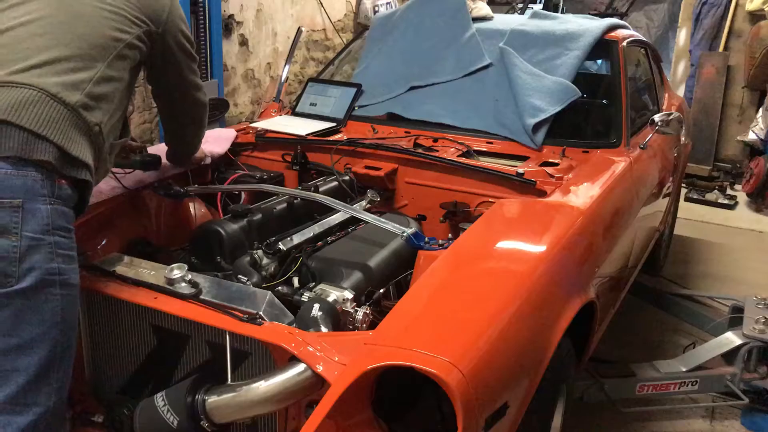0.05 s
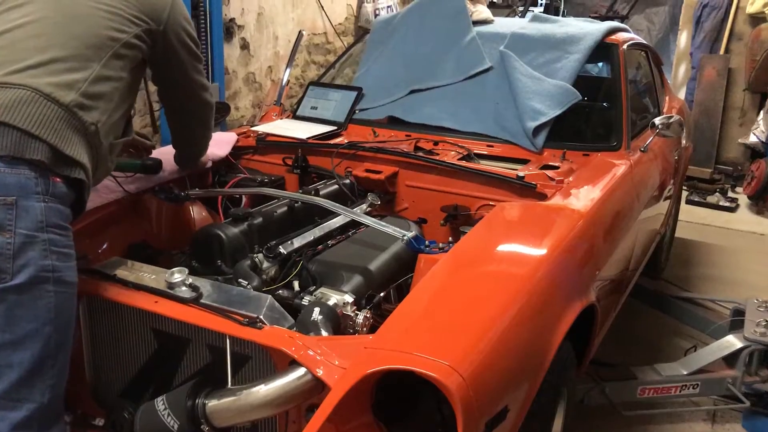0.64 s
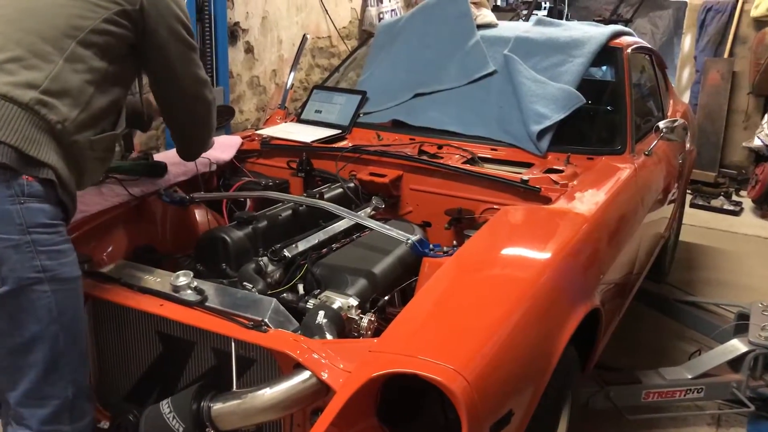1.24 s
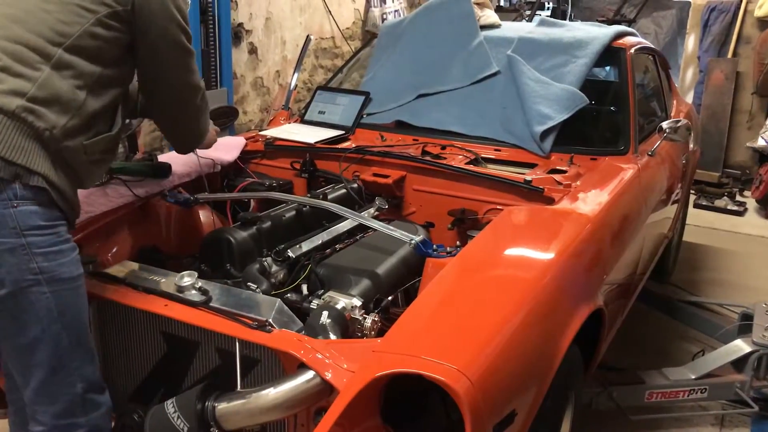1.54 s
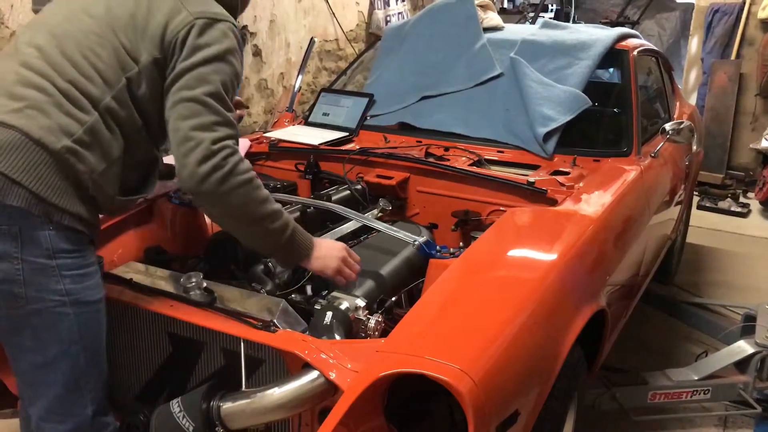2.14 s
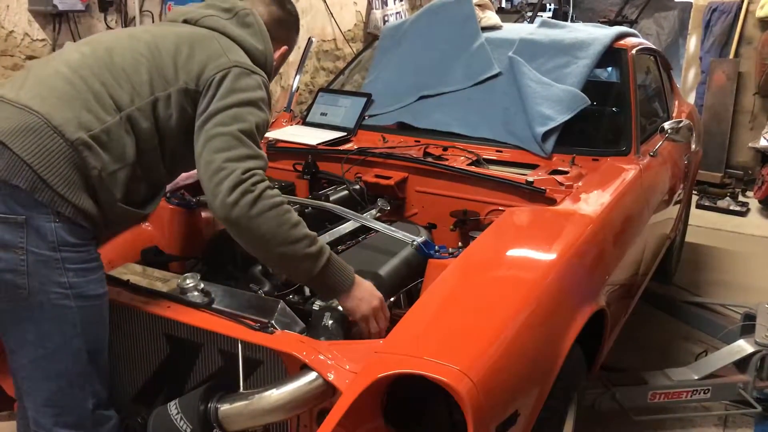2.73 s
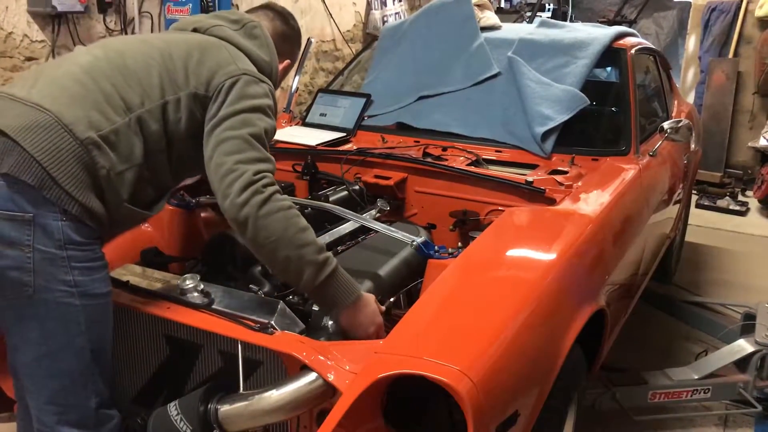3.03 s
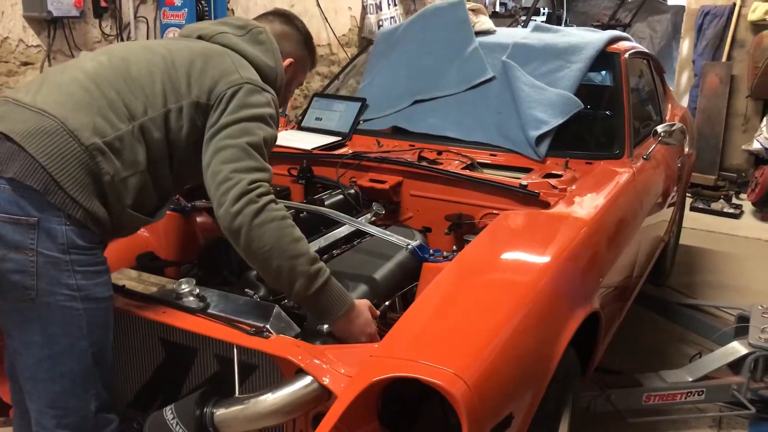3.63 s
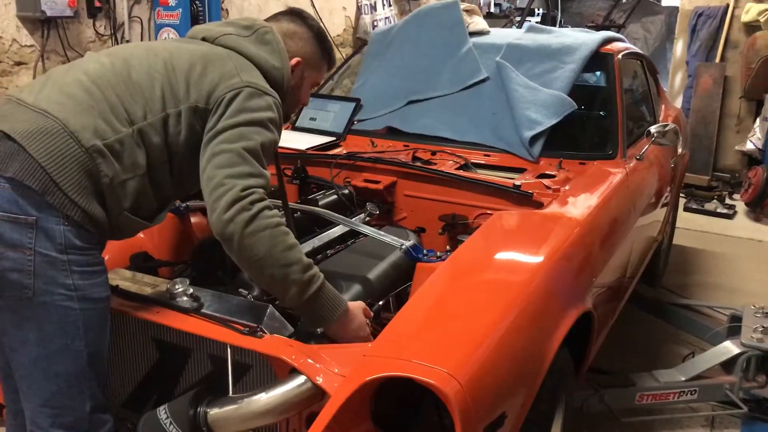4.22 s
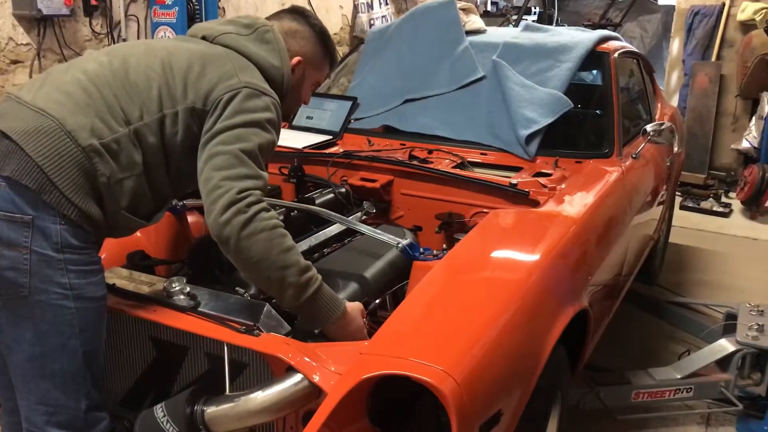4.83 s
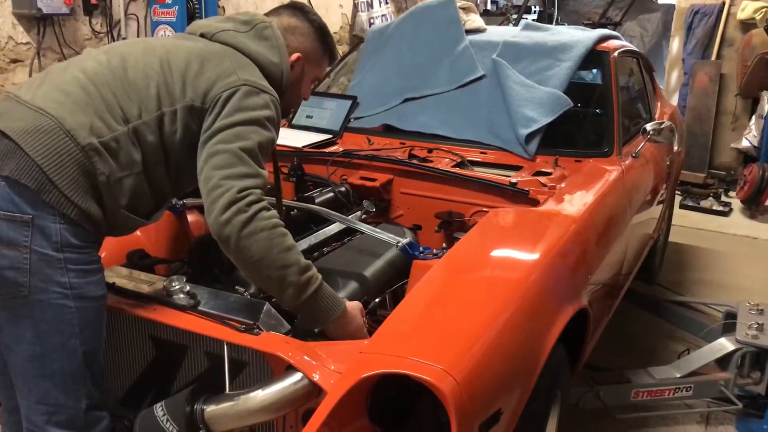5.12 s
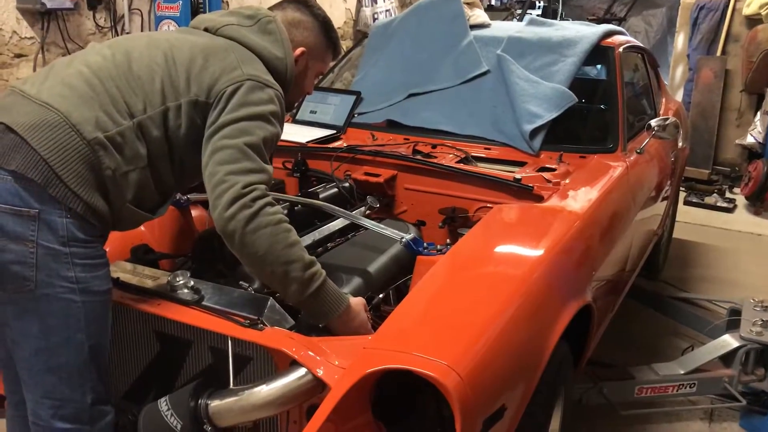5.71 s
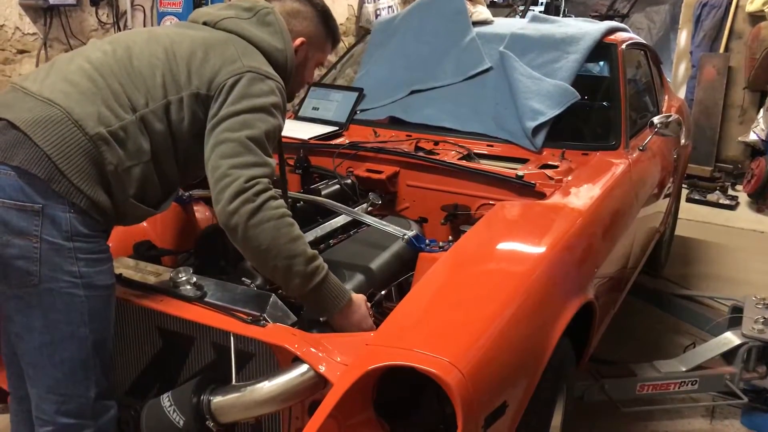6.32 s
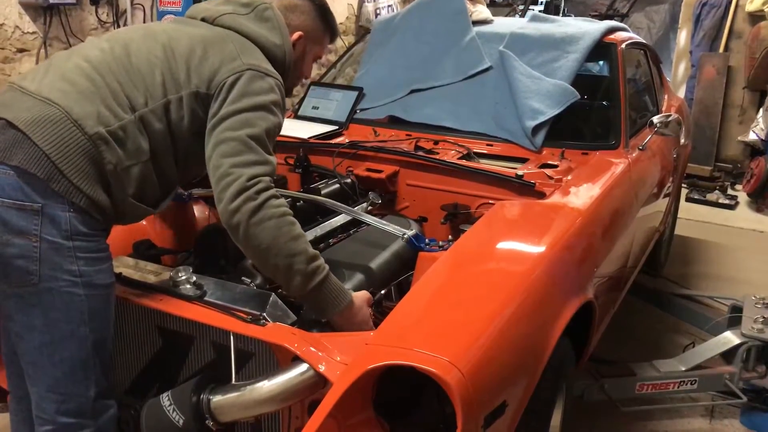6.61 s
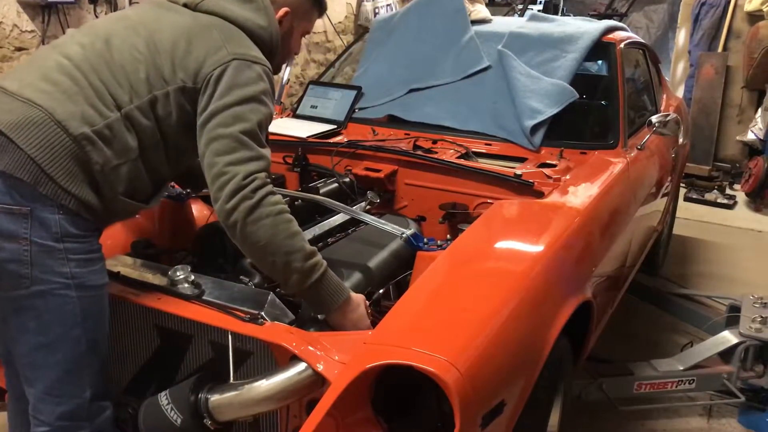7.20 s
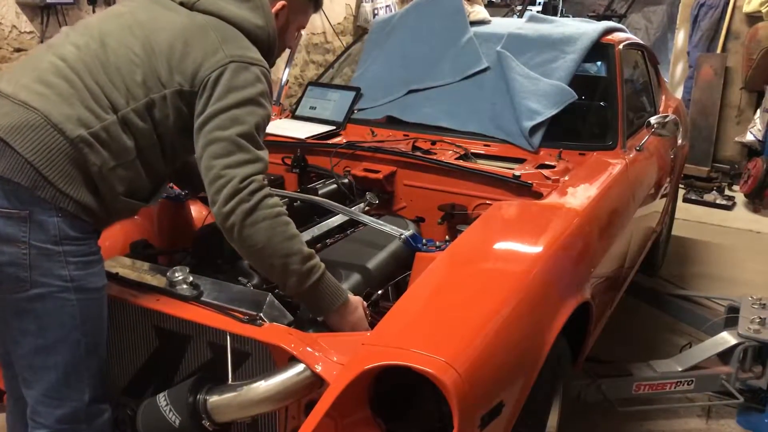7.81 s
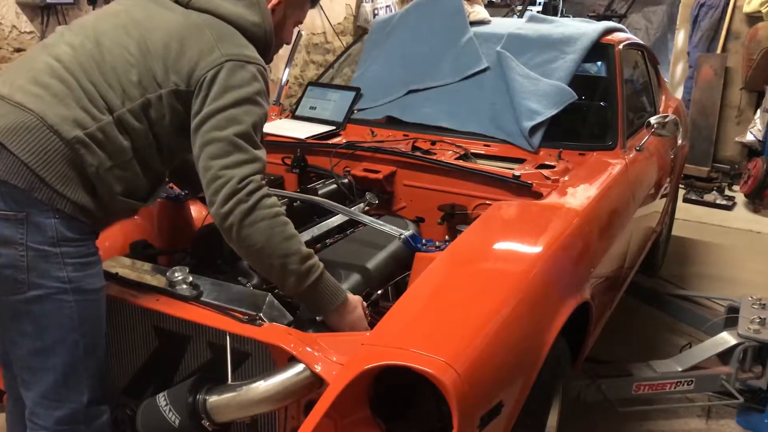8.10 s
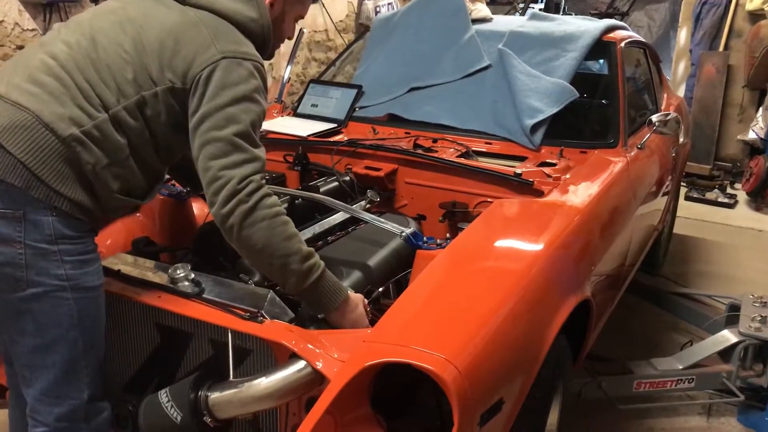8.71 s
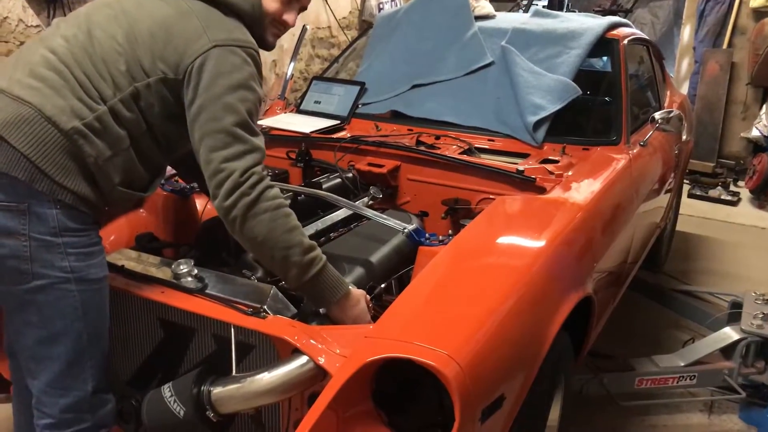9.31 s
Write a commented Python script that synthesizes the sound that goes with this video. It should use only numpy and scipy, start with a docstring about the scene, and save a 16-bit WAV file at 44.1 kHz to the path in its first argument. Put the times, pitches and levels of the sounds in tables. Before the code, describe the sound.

For the first three seconds the workshop is very quiet, with faint sleeve rustles and a few light handling clicks. A weak, wavering whine comes and goes from about 1.5 to 3 seconds, leaving only a low room rumble. At 4.6 seconds a starter engages with a sharp clack and cranks with a metallic, grinding whirr and pulsing hisses. The car engine coughs at about 5.7 seconds, stumbles, then catches just after 6 and revs up loudly, with a deep exhaust drone, valve clatter and rasping intake. The revs sag around 7 seconds, and the throttle gives a tiny squeak. From 7.4 seconds until the end, a little past 9, uneven blips follow one another, broken by thumping, spitting backfires, strongest near 7.8 and 8.2 seconds. It is all heard from in front of the open engine bay, with a short room echo.

```python
"""Straight-six starting in a workshop

Heard from in front of the open engine bay. Sleeves rustle, things click, a faint whine comes and goes.
The starter pinion slams in and its teeth ring the bell housing, slowing at each compression. The engine
coughs, catches and is blipped unevenly by hand: firings drone and thud in the exhaust, valves clatter
on the block, and gulps of air rasp in the intake, which spits when a charge burns late."""
import sys
import numpy as np
from scipy import signal
from scipy.fft import rfft, irfft, next_fast_len
from scipy.io import wavfile
from scipy.ndimage import uniform_filter1d, map_coordinates

SR = 44100
rng = np.random.default_rng(int(sys.argv[2]) if len(sys.argv) > 2 else 0)


def unload_audio(sound):
    """Save the sound as a 16-bit wav file, at the path given as the first command line argument."""
    columns = np.transpose(np.atleast_2d(sound))
    # keep every value between -1 and 1, then stretch to whole-number steps
    steps = np.round(np.clip(columns, -1, 1) * 32767)
    wavfile.write(sys.argv[1], SR, steps.astype(np.int16))


N = 412335


def amp(db):
    """dB to gain."""
    return 10 ** (np.asarray(db) / 20)


def unit(x):
    """x at rms 1."""
    return x / np.sqrt(np.mean(x ** 2) + 1e-20)


def clock():
    """Seconds at each sample."""
    return np.arange(N) / SR


def along(points, hz):
    """Interpolate (freq_hz, value) points on a log axis."""
    freqs, values = np.transpose(points)
    return np.interp(np.log(hz + 1), np.log(freqs + 1), values)


def curves(rows):
    """One value per sample for each column after the time."""
    time_s, *columns = np.transpose(rows)
    return [np.interp(clock(), time_s, column) for column in columns]


def fade(start_s, length_s):
    """Ramp from 0 to 1."""
    return np.clip((clock() - start_s) / length_s, 0, 1)


def swell(start_s, held_s, rise_s, decay_s):
    """Envelope that rises, then decays from held_s after its start."""
    return fade(start_s, rise_s) * np.exp(-np.maximum(clock() - start_s - held_s, 0) / decay_s)


def wobble(rate_hz):
    """Smooth random curve."""
    return map_coordinates(rng.standard_normal(int(N * rate_hz / SR) + 4), [clock() * rate_hz])


def filtered(x, response):
    """x through a complex frequency response."""
    size = next_fast_len(N + SR // 2)
    return irfft(rfft(x, size) * response(np.fft.rfftfreq(size, 1 / SR)), size)[:N]


def coloured(x, spectrum):
    """x shaped by a spectrum, rms 1."""
    return unit(filtered(x, lambda hz: amp(along(spectrum, hz))))


def noise(spectrum):
    """Noise shaped by (freq_hz, level_db) points, rms 1."""
    return coloured(rng.standard_normal(N), spectrum)


def ringing(x, modes):
    """x through (pitch_hz, width_hz, level_db) resonances, rms 1."""
    def response(f):
        return sum((-1) ** k * amp(db) * 1j * f * width / (hz * hz - f * f + 1j * f * width)
                   for k, (hz, width, db) in enumerate(modes))
    return unit(filtered(x, response))


def patchy(x, depth_db):
    """Turbulence: brief patches of the spectrum swell and sink; rms 1."""
    spectra = signal.stft(x, nperseg=512)[2]
    field = uniform_filter1d(rng.standard_normal(spectra.shape), size=7, axis=0)
    field = unit(uniform_filter1d(field, size=6, axis=1))
    return unit(signal.istft(spectra * amp(depth_db * field), nperseg=512)[1][:N])


def pulses(count, pattern, scatter):
    """An impulse at each whole count, sized by a repeating pattern with log-normal scatter."""
    at = np.flatnonzero(np.diff(np.floor(count)) > 0)
    train = np.zeros(N)
    train[at] = np.resize(pattern, len(at))
    return train * np.exp(scatter * rng.standard_normal(N))


def trail(train, decay_s):
    """Exponential tail on each impulse."""
    return signal.lfilter([1], [1, -np.exp(-1 / (SR * decay_s))], train)


def bursts(start_s, level_db, decay_s, rise_s=0.001):
    """Envelope of sudden blows that die away."""
    blows = np.bincount(np.round(start_s * SR).astype(int), amp(level_db), N)
    return trail(blows, decay_s) - trail(blows, rise_s)


# room background: freq_hz, level_db
ROOM_SPECTRUM = [(12, -49), (20, -19), (65, 1), (150, -8.5), (270, -13.5), (520, -19), (1000, -22),
                 (1860, -24), (3630, -28), (5000, -32), (13000, -38), (16000, -45)]

def room_tone(level_db=-62):
    """Steady low rumble of the quiet room."""
    return amp(level_db) * noise(ROOM_SPECTRUM)


# sleeve movements: start_s, held_s, level_db
SLEEVE_MOVES = [(0.07, .03, -63.5), (1.18, .3, -68.5), (1.59, .4, -64), (2.1, 0.62, -70.5)]
# cloth friction: freq_hz, level_db
CLOTH_SPECTRUM = [(500, -9), (1500, 1), (2250, -1), (3000, -5), (4800, -9), (9000, -17.5)]

def sleeves(gain_db=-2):
    """Cloth rubs in short, uneven strokes."""
    strokes = sum(amp(db) * swell(start_s, held_s, rise_s=0.0084, decay_s=0.2)
                  for start_s, held_s, db in SLEEVE_MOVES)
    return strokes * amp(gain_db + wobble(26)) * noise(CLOTH_SPECTRUM)


# handling taps: start_s, level_db, knock_offset_db
HANDLING_TAPS = [(0.0994, -63, -12), (0.6994, -56, -6), (1.1982, -52.5, 4), (1.6067, -43.5, -11),
                 (1.6294, -57, -12), (1.694, -47, -11), (1.9924, -45.5, -19), (2.2944, -50, -11),
                 (2.3694, -56, 0), (2.5194, -55, 2)]
# sharp click: freq_hz, level_db
CLICK_SPECTRUM = [(800, -30), (2200, 2), (4800, 0.5), (7000, -7), (10000, -13.5), (16000, -12)]
# midrange of a knock or cough: freq_hz, level_db
BARK_SPECTRUM = [(200, -26), (550, 0.5), (800, 4.5), (1100, 5.5), (1500, -4.5), (2300, -15), (5000, -27)]

def taps(click_db=-6, knock_db=-8):
    """Small handling impacts, each a click over a duller knock."""
    start_s, level_db, offset_db = np.transpose(HANDLING_TAPS)
    clicks = bursts(start_s, level_db + click_db, decay_s=0.011) * noise(CLICK_SPECTRUM)
    knocks = bursts(start_s, level_db + offset_db + knock_db, decay_s=0.012) * noise(BARK_SPECTRUM)
    return clicks + knocks


# whine contour: time_s, pitch_hz, level_db
WHINE_PATH = [(1.35, 620, -83), (1.65, 690, -70), (1.95, 713, -80), (2.5, 741, -68.5), (2.93, 673, -74),
              (3.1, 653, -92)]

def whine(overtone_db=-7):
    """A faint, wavering tone rises and sinks."""
    pitch_hz, level_db = curves(WHINE_PATH)
    phase = 2 * np.pi * np.cumsum(pitch_hz * (1 + 0.026 * wobble(120))) / SR
    tone = np.sin(phase) + amp(overtone_db + 3.4 * wobble(7.6)) * np.sin(3 * phase)
    return amp(level_db + 3.8 * wobble(22)) * tone * fade(1.3, 0.1) * (1 - fade(3.05, 0.1))


# solenoid and pinion impacts: start_s, level_db
SLAM_HITS = [(4.563, -28.5), (4.577, -20), (4.589, -18)]
# impact noise: freq_hz, level_db
SLAM_SPECTRUM = [(35, -48), (60, -19), (124, -15), (227, -18), (553, -2.5), (842, -11), (991, -9),
                 (1780, -7), (2000, -11), (5860, -15), (16000, -32)]

def pinion_slam():
    """The solenoid bangs the pinion into the flywheel."""
    return bursts(*np.transpose(SLAM_HITS), decay_s=0.019) * noise(SLAM_SPECTRUM)


# bell housing modes: pitch_hz, width_hz, level_db
HOUSING_MODES = [(380, 55, -19), (485, 40, -2), (555, 45, -9), (668, 42, 3.5), (735, 45, -6), (890, 60, -9),
                 (950, 60, -11), (1040, 50, -10), (1125, 45, -6), (1250, 80, -11), (1428, 60, -9),
                 (1497, 50, -5), (1820, 90, -11), (2750, 300, -15), (3160, 300, -20)]
# gear grinding: freq_hz, level_db
GRIND_SPECTRUM = [(53, -48), (90, -26), (129, -22), (193, -19), (265, -4.5), (360, -8), (471, -1.5),
                  (588, -26), (667, 2), (810, -12.5), (1130, -2), (1230, -17), (2500, -18), (3250, -44),
                  (5500, -120)]
# pinion scraping: freq_hz, level_db
SCRAPE_SPECTRUM = [(900, -6), (2000, -9), (3000, -4.5), (4000, -3.5), (5400, 2.5), (6500, -4),
                   (7800, -13.5), (10500, -14.5), (12500, -17.5), (16000, -18)]

def starter_gears(strain, overrun, tooth_hz=520, sag=0.13, ring_db=-30, grind_db=-32.5, scrape_db=-33):
    """Teeth ring the bell housing, grind and scrape, slowing at each compression."""
    teeth = np.cumsum(tooth_hz * (1 - sag * strain + 0.04 * wobble(50))) / SR
    mesh = unit(pulses(teeth, [1], scatter=0.23)) + 0.96 * rng.standard_normal(N)
    housing = patchy(ringing(mesh, HOUSING_MODES), depth_db=2.2)
    unloaded = 1 - fade(4.8, 0.038)
    letting_go = np.interp(clock() - 0.041, clock(), strain)  # loudest just after each compression
    labour_db = 3 * letting_go - 1.9 * unloaded
    whirr = amp(labour_db) * (amp(ring_db) * housing + amp(grind_db) * noise(GRIND_SPECTRUM))
    hiss_db = scrape_db + 0.5 * strain - 6 * unloaded * (1 - strain) + 5 * overrun + 1.4 * wobble(90)
    scrape = amp(hiss_db) * coloured(mesh + 2 * rng.standard_normal(N), SCRAPE_SPECTRUM)
    return whirr + scrape


def starter_hum(start_s, overrun, pitch_hz=131, level_db=-31, sag_db_per_s=20.5):
    """The motor hums most while its current is high."""
    current = amp(-sag_db_per_s * np.maximum(clock() - start_s, 0)) + 0.7 * overrun
    rumble = noise([(70, -20), (130, -17), (220, -35)])
    return amp(level_db) * current * ringing(rumble, [(pitch_hz, 22, 0)])


def chuff(level_db=-36):
    """Unburnt air puffs from the exhaust, strongest on the first strokes."""
    air = noise([(22, -28), (42, 10), (65, 6), (95, -30), (250, -67)])
    return air * fade(4.82, 0.032) * amp(level_db - 10 * fade(4.99, 0.088))


# cranking compressions: time_s, hiss_db
COMPRESSIONS = [(4.55, -50), (4.68, -42), (4.87, -33.5), (5.01, -32.5), (5.155, -28.5), (5.274, -32),
                (5.41, -32), (5.54, -28), (5.634, -27), (5.729, -40), (5.83, -28.5), (5.94, -28),
                (6.021, -25), (6.102, -34)]
# escaping air: freq_hz, level_db
SQUEEZE_SPECTRUM = [(1500, -9), (3000, 2), (5300, -1.5), (7000, -1.5), (9000, -4.5), (11500, -11),
                    (16000, -23)]

def cranking(engage_s=4.585, overrun_s=5.53, release_s=5.98):
    """The starter labours through compressions, each squeezing out a hiss, until the engine runs away."""
    strokes = np.interp(clock(), np.transpose(COMPRESSIONS)[0], np.arange(len(COMPRESSIONS)))
    strain = np.cos(2 * np.pi * strokes)
    overrun = fade(overrun_s, 0.16)
    gears = starter_gears(strain, overrun)
    hiss_db, = curves(COMPRESSIONS)
    squeeze = amp(hiss_db) * ((1 + strain) / 2) ** 2 * noise(SQUEEZE_SPECTRUM)
    engaged = fade(engage_s, 0.01) * (1 - fade(release_s, 0.22))
    return engaged * (gears + squeeze + starter_hum(engage_s, overrun) + chuff())


# pinion throw-outs: start_s, level_db
PINION_KICKS = [(5.61, -28), (5.991, -26.5), (6.172, -13)]

def pinion_sing():
    """The pinion sings as the engine throws it out."""
    kicks = sum(amp(db) * swell(s, held_s=0.022, rise_s=0.021, decay_s=0.017) for s, db in PINION_KICKS)
    return kicks * noise([(4500, -30), (5600, -6), (6050, -5), (6500, -13), (7500, -40)])


# exhaust response to shaft orders: pitch_hz, level_db
PIPE_RESPONSE = [(28, -42), (45, -26), (55, -19), (64, -14), (75, -12.5), (87, -30), (101, -21),
                 (115, -14.5), (130, -27.5), (152, -16.5), (166, -20), (184, -13.5), (195, -15),
                 (210, -28.5), (246, -25), (285, -44)]

def exhaust_drone(speed_hz, turns, drive, rough, idle_db=-13, idle_tilt_db=4.5, blur_rad=0.6):
    """Even firing drones on the first four shaft orders."""
    drone = 0
    for order, trim_db in enumerate((-1.5, -0.5, 0, -1), 1):
        level_db = along(PIPE_RESPONSE, order * speed_hz) + trim_db + 2 * wobble(12)
        push = drive + amp(idle_db - idle_tilt_db * (order - 1.5))
        phase = 2 * np.pi * order * turns + blur_rad * rough * wobble(35)
        drone -= np.sqrt(2) * push * amp(level_db) * np.cos(phase)
    return drone


# cylinders in firing order: relative_strength
FIRING_PATTERN = [1, 0.11, 0.98, 0.83, 0.22, 0.54]
# exhaust pipe modes: pitch_hz, width_hz, level_db
PIPE_MODES = [(47.6, 4.4, 3), (64, 6.6, -0.5), (113.5, 34, -2.5), (172, 45, -6)]

def exhaust_thuds(turns, drive, gain_db=-9, idle_db=-18.5):
    """Uneven firings, three a turn, thud in the pipe's resonances."""
    firings = pulses(3 * turns, FIRING_PATTERN, scatter=0.5) * rng.standard_normal(N)
    thuds = coloured(ringing(firings, PIPE_MODES), [(25, -32), (40, -7), (190, -6.5), (270, -9), (600, -34)])
    local_rms = np.sqrt(np.abs(uniform_filter1d(thuds ** 2, size=5000)) + 1e-4)
    return amp(gain_db) * (drive + amp(idle_db)) * thuds / local_rms


def gulped_air(gulps):
    """Noise pulsing with the intake strokes, rms 1."""
    return unit(gulps * rng.standard_normal(N))


# valve clatter: freq_hz, level_db
CLATTER_SPECTRUM = [(120, -17), (250, 4), (340, 2.5), (480, 4), (680, 6), (900, -1), (1500, -5),
                    (2300, -11.5), (5000, -21.5)]
# block modes: pitch_hz, level_db
BLOCK_MODES = [(430.7, -40.5), (834.4, -45.5), (899.0, -40), (1055, -38.5), (1249, -41), (1771, -41.5),
               (1857, -51), (1970, -68), (2094, -52)]

def block_clatter(turns, gulps, clatter_db=-4.5, ring_db=-9, width_hz=28):
    """Valves knock six times a turn and the block rings."""
    valves = gulped_air(gulps) + 0.34 * unit(pulses(6 * turns, FIRING_PATTERN, scatter=0.62))
    ring = ringing(gulped_air(gulps), [(hz, width_hz, db) for hz, db in BLOCK_MODES])
    block = amp(clatter_db) * coloured(valves, CLATTER_SPECTRUM) + amp(ring_db) * ring
    return patchy(block, depth_db=2.84)


# intake air: freq_hz, level_db
RASP_SPECTRUM = [(500, -24), (1200, -4.5), (2000, 0.5), (2800, -2), (4400, -0.5), (6200, -3.5), (7800, -8),
                 (9300, -8.5), (10500, -13.5), (12000, -10.5), (16000, -13.5)]
# intake runner modes: pitch_hz, level_db
RUNNER_MODES = [(2460, -45.5), (2573, -44), (2638, -34.5), (2789, -41), (3036, -42.5), (3300, -92),
                (3558, -43), (3860, -36.5), (3984, -43), (4630, -37), (4743, -44), (4791, -61), (6029, -40)]

def intake_rasp(gulps, rush_db=-3.5, ring_db=-10, width_hz=55):
    """Each cylinder gulps air through the resonant runners."""
    rush = coloured(gulped_air(gulps), RASP_SPECTRUM)
    ring = ringing(gulped_air(gulps), [(hz, width_hz, db) for hz, db in RUNNER_MODES])
    return amp(0.57 * wobble(45)) * patchy(amp(rush_db) * rush + amp(ring_db) * ring, depth_db=2.5)


# upper shaft orders: order, level_db
GROWL_ORDERS = [(5, -14.5), (6, -20), (7, -16), (8, -15), (9, -18), (10, -27), (12, -24.5), (15, -16)]

def growl(turns, rough, gain_db=-1, blur_rad=1.3):
    """Upper shaft orders give the revs their throat; uneven firing blurs them."""
    orders = 0
    for order, db in GROWL_ORDERS:
        gain = amp(db + 5.3 * wobble(14))
        orders += gain * np.cos(2 * np.pi * order * turns + blur_rad * rough * wobble(40))
    return amp(gain_db) * np.sqrt(2) * orders


def rockers(turns, low_hz=2400, high_hz=5000, decay_s=0.002, spread_db=2, gain_db=-9):
    """Six ticks a turn, each of random pitch and strength, merge into chatter."""
    at = np.flatnonzero(np.diff(np.floor(6 * turns)) > 0)
    pitch, size = rng.random((len(at), 2)).T
    t = np.arange(SR // 20) / SR
    pitch_hz = low_hz * (high_hz / low_hz) ** pitch[:, None]
    strength = amp(spread_db * np.clip(-np.log(size), 0, 2))[:, None]
    ticks = strength * np.sin(2 * np.pi * pitch_hz * t) * np.exp(-t / decay_s)
    samples = at[:, None] + np.arange(len(t))
    return amp(gain_db) * unit(np.bincount(samples.ravel(), ticks.ravel(), N)[:N])


# backfires: start_s, thump_db, bark_db, spit_db
COUGHS = [(5.682, -23, -23.5, -10.5), (5.732, -30, -36, -6.5), (5.932, -43, -28.5, -30),
          (6.058, -18, -31, -10.5), (6.101, -19, -21.5, -11.5), (6.185, -15, -21, -17),
          (7.342, -48, -35, -32), (7.386, -28, -34, -21), (7.424, -27, -46, -15.5), (7.585, -14, -17, -27),
          (7.753, -8.5, -25, -16.5), (8.078, -31, -38, -22), (8.168, -10.5, -10, -15.5),
          (8.746, -16.5, -31, -25), (9.223, -17, -43, -21)]

def backfires():
    """Late-burning charges thump in the pipe and spit back through the intake."""
    start_s, thump_db, bark_db, spit_db = np.transpose(COUGHS)
    rumble = noise([(25, -30), (45, -3), (180, -6), (250, -32), (900, -60)])
    thump = bursts(start_s, thump_db, decay_s=0.036) * rumble
    bark = bursts(start_s, bark_db, decay_s=0.033) * noise(BARK_SPECTRUM)
    spit = bursts(start_s, spit_db, decay_s=0.023) * noise(RASP_SPECTRUM)
    return thump + bark + spit


def hesitation(dip_db=-7, lead_s=0.0062):
    """Gain dip of a misfire just before each cough."""
    ahead_s = np.transpose(COUGHS)[0][:, None] - clock()
    nearness = (ahead_s > 0) * np.exp(-np.abs(ahead_s) / lead_s)
    return amp(dip_db * np.max(nearness, axis=0))


# exhaust booms: start_s, level_db
CATCH_BOOMS = [(5.7, -14.5), (6.07, -19.5)]

def booms(pitch_hz=42):
    """The pipe booms after each stumbling catch."""
    envelope = sum(amp(db) * swell(s, held_s=0.074, rise_s=0.042, decay_s=0.17) for s, db in CATCH_BOOMS)
    return envelope * np.sqrt(2) * np.sin(2 * np.pi * pitch_hz * clock() + 0.55 * wobble(7.1))


def linkage_squeak(start_s=7.28, held_s=0.049, pitch_hz=2390, glide_hz_per_s=900, level_db=-37):
    """The throttle linkage squeaks as it is pulled open."""
    glide_hz = pitch_hz + glide_hz_per_s * np.clip(clock() - start_s, 0, 2 * held_s)
    phase = 2 * np.pi * np.cumsum(glide_hz * (1 + 0.016 * wobble(250))) / SR
    return amp(level_db) * swell(start_s, held_s, rise_s=0.044, decay_s=0.0089) * np.sin(phase)


# throttle blips: start_s, held_s, rise_s, exhaust_db, clatter_db, rasp_db, rasp_sag_db_per_s
THROTTLE_BLIPS = [(5.68, 0.09, 0.046, -8, -23, -29, 10), (6.078, 0.71, 0.051, 1, -20.5, -13.5, 24),
                  (7.181, .16, 0.038, -40, -58, -46, -6), (7.374, 0.26, .12, -1, -20.5, -13, 24),
                  (7.754, 0.21, 0.052, 0, -21, -16.5, 37), (7.989, 0.52, 0.074, -3, -27, -25.5, 15.5),
                  (8.73, .26, .21, -7.5, -28, -24.5, 1.5), (8.98, 0.11, 0.066, 1, -22, -20, 23),
                  (9.221, 0.21, 0.05, -0.5, -26.5, -24, 10)]

def throttle():
    """Exhaust, clatter and rasp envelopes; all die away once the throttle shuts."""
    blips = []
    for start_s, held_s, rise_s, exhaust_db, clatter_db, rasp_db, sag_db_per_s in THROTTLE_BLIPS:
        age_s = np.maximum(clock() - start_s, 0)
        opening = swell(start_s, held_s, rise_s, decay_s=0.05)
        exhaust = amp(exhaust_db) * swell(start_s, held_s, rise_s, decay_s=0.045)
        clatter = amp(clatter_db - 17.5 * age_s) * opening  # quietens as the revs catch up
        rasp = amp(rasp_db - sag_db_per_s * age_s) * opening
        blips.append((exhaust, clatter, rasp))
    return np.max(blips, axis=0)


# crankshaft speed: time_s, speed_hz
SHAFT_SPEED = [(5.66, 14.9), (5.76, 25), (6.02, 15.6), (6.13, 34), (6.2, 44), (6.34, 50.3), (6.52, 55.5),
               (6.62, 62.8), (6.72, 63.6), (6.85, 64.3), (7.39, 31.7), (7.5, 43.2), (7.62, 50.4),
               (7.76, 46.4), (7.88, 55.2), (7.95, 62), (8.06, 56.2), (8.5, 68.2), (8.8, 43.3), (8.93, 46.5),
               (9.1, 63.4), (9.22, 55.2), (9.35, 62.5)]

def engine(idle_clatter_db=-37.5, idle_rasp_db=-46, slow_hz=28, fast_hz=60, throb_depth=0.12):
    """Each blip drives exhaust, block and intake together; burning evens out under throttle at speed."""
    speed_hz, = curves(SHAFT_SPEED)
    turns = np.cumsum(speed_hz) / SR
    drive, pulling, suction = throttle()
    coasting = amp(idle_clatter_db + 13 * np.log2(speed_hz / 70.3))  # 13 dB per doubling of speed
    clatter = np.hypot(pulling, coasting)
    rasp = np.hypot(suction, amp(idle_rasp_db))
    evenness = np.minimum(drive, 1) * np.interp(speed_hz, [slow_hz, fast_hz], [0, 1])
    rough = np.interp(evenness, [0, 1], [0.7, 0.07])

    gulps = 1 + unit(trail(pulses(3 * turns, FIRING_PATTERN, scatter=0.5), decay_s=0.013))
    bay = clatter * block_clatter(turns, gulps) + rasp * intake_rasp(gulps)
    bay += pulling * growl(turns, rough) + rasp * rockers(turns)
    bay *= 1 + throb_depth * np.cos(2 * np.pi * turns)  # unequal cylinders

    pipe = np.sqrt(1 - rough ** 2) * exhaust_drone(speed_hz, turns, drive, rough)
    pipe += rough * exhaust_thuds(turns, drive) + booms()
    pipe *= amp(0.91 * np.sqrt(rough) * wobble(55))
    return fade(5.67, 0.024) * pipe + fade(5.68, 0.046) * hesitation() * bay


# wall reverberation: freq_hz, t60_s
WALL_DECAY = [(100, 0.96), (1000, 0.49), (5000, 0.15), (14000, 0.39)]

def workshop_echo(x, delay_samples=200):
    """Cluttered walls answer briefly, soaking up the bass."""
    hz, t, spectra = signal.stft(rng.standard_normal(SR // 2), SR, nperseg=256)
    decay = amp(-60 * t / along(WALL_DECAY, hz)[:, None])
    tail = signal.istft(spectra * decay, SR, nperseg=256)[1]
    echo = signal.fftconvolve(x, np.pad(tail / np.linalg.norm(tail), (delay_samples, 0)))[:N]
    return filtered(echo, lambda f: amp(along([(200, -14), (400, 0)], f)))


def scene(echo_db=-7):
    """Car and handling noises, their echo and the quiet room."""
    starter = cranking() + pinion_slam() + pinion_sing()
    running = engine() + backfires() + linkage_squeak()
    direct = starter + running + taps() + sleeves() + whine()
    return direct + amp(echo_db) * workshop_echo(direct) + room_tone()


def record(dry, low_hz=22, top_hz=16100):
    """Rumble cut, soft clipping, a brief opening silence and a band limit."""
    lean = signal.sosfilt(signal.butter(2, low_hz, "high", fs=SR, output="sos"), dry)
    rounded = lean / (1 + np.abs(lean) ** 6) ** (1 / 6)
    return filtered(rounded * fade(0.08, 0.01), lambda hz: np.clip((top_hz - hz) / 300, 0, 1))


dry = scene()
out = record(dry)
unload_audio(out)
```